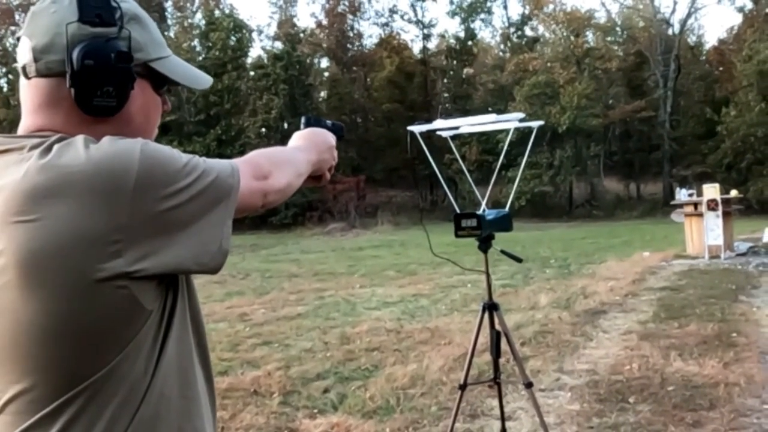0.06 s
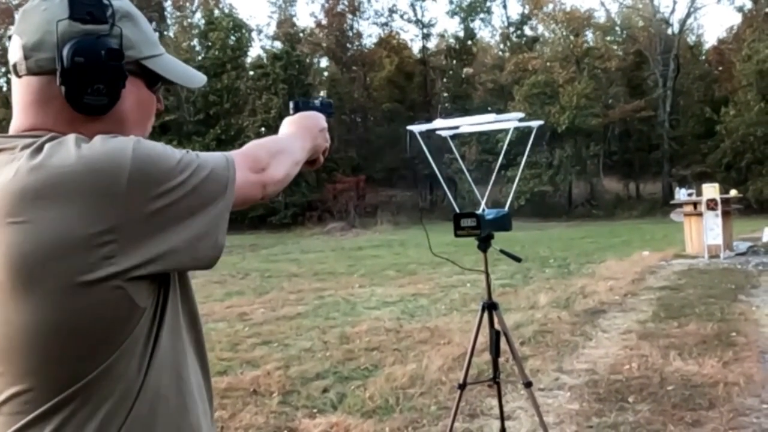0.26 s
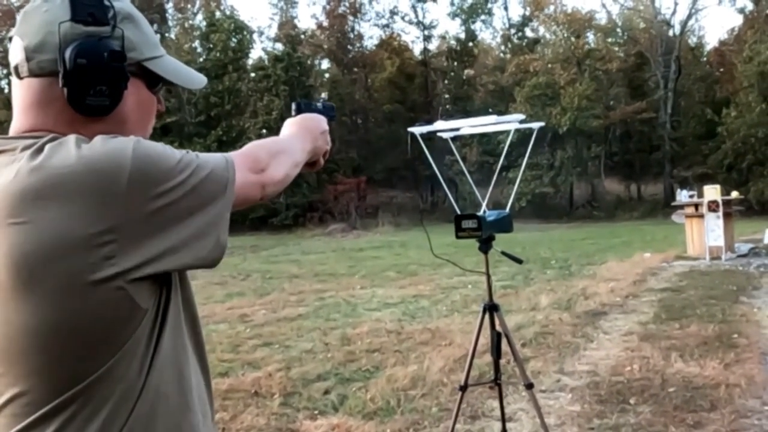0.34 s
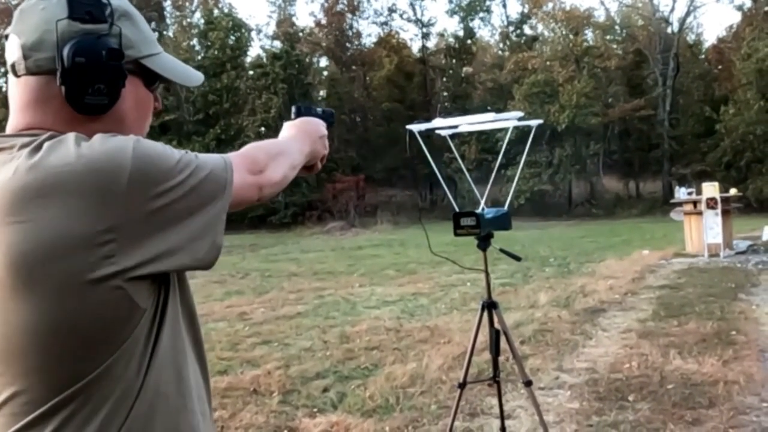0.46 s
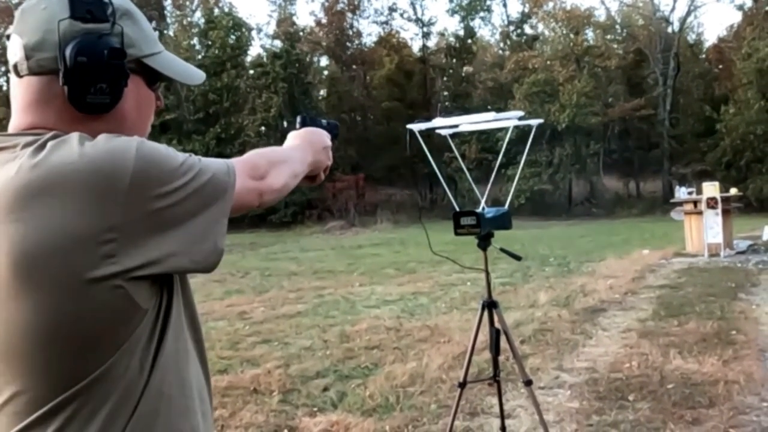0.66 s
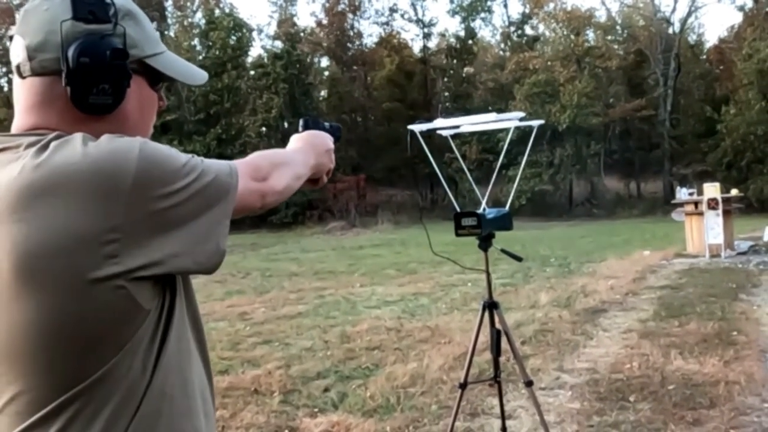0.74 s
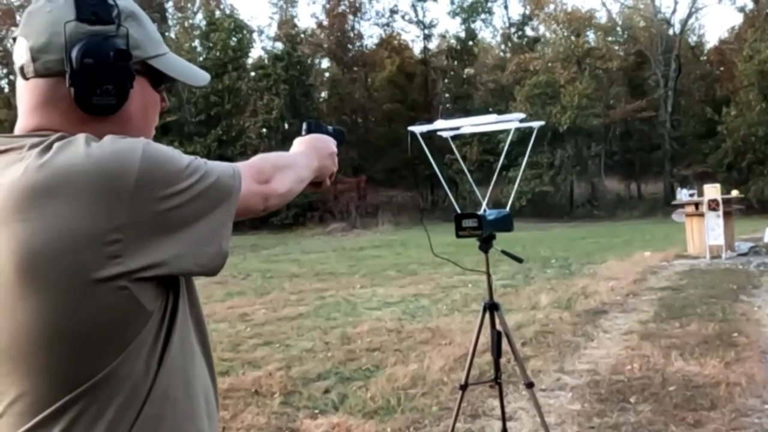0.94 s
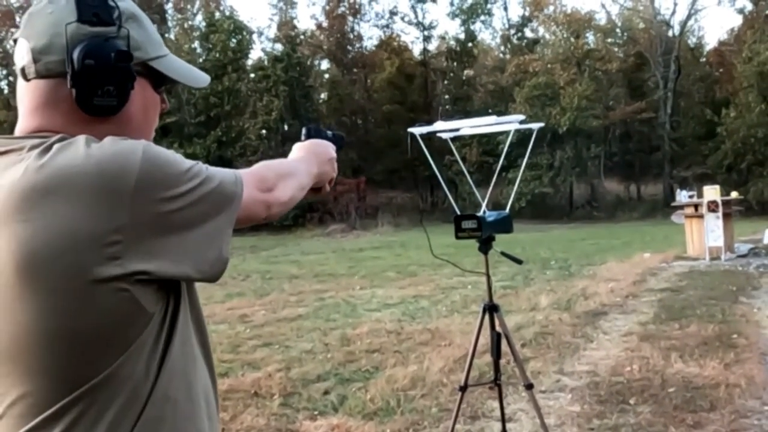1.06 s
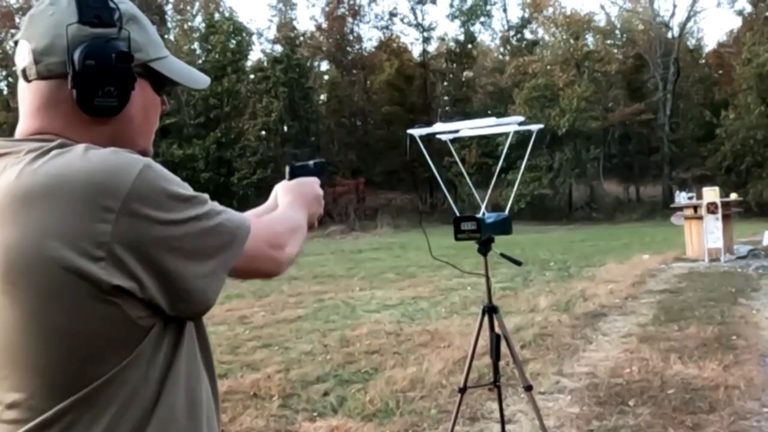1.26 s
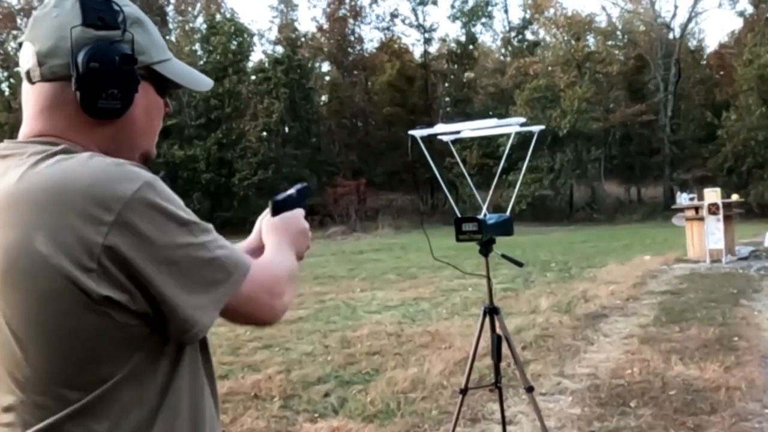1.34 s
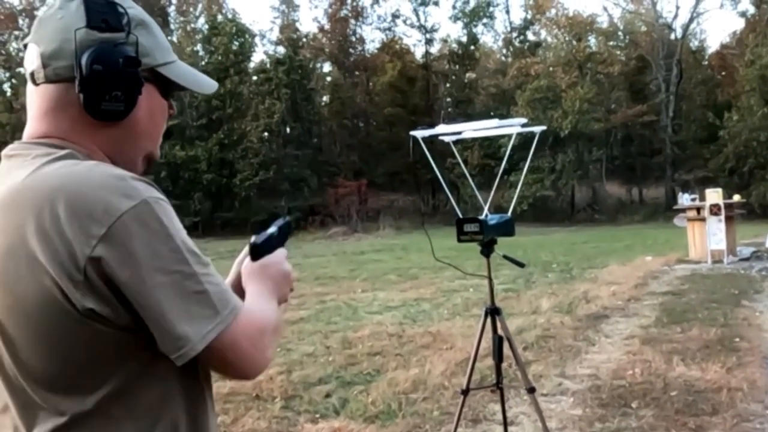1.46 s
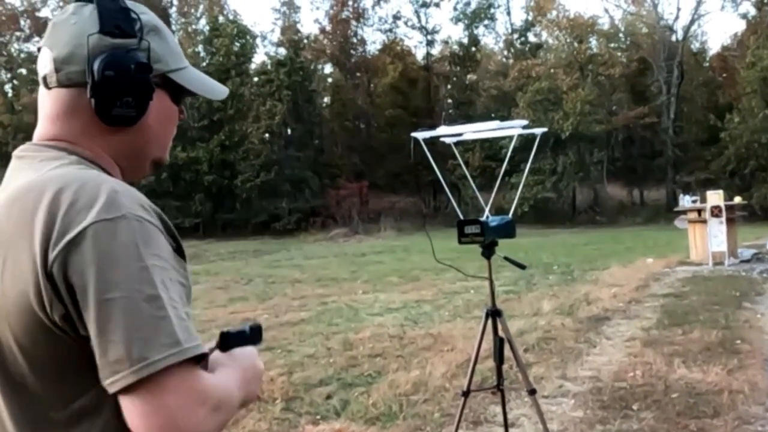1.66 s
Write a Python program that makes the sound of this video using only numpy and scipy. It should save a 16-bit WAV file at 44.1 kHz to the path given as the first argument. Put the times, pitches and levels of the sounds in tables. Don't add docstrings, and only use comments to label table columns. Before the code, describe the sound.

A single close pistol shot bursts out of a light breeze and faint insects, hard and overloaded on a small camera microphone; slap echoes and a dull woodland roll follow, with an empty casing ticking down.

```python
import sys
import numpy as np
from scipy import signal
from scipy.io import wavfile
from scipy.ndimage import uniform_filter1d

SR = 44100
rng = np.random.default_rng(int(sys.argv[2]) if len(sys.argv) > 2 else 0)


def log_audio(samples):
    frames = np.atleast_2d(samples).T
    limited = np.clip(frames, -1, 1)
    pcm = np.round(limited * 32767).astype(np.int16)
    wavfile.write(sys.argv[1], SR, pcm)


def attenuation_scalar(level_db):
    decades = np.asarray(level_db, float) / 20
    return 10 ** decades


N = 74970
T = np.arange(N) / SR
SHOT_S = .2218


def colour(points, hz):
    p = np.array(points)
    return np.interp(np.log(hz), np.log(p[:, 0]), p[:, 1])


def low_pass(x, hz, order):
    return signal.sosfilt(signal.butter(order, hz, fs=SR, output="sos"), x)


def band(x, hz, width=np.sqrt(2), order=2):
    edges = [hz / np.sqrt(width), min(hz * np.sqrt(width), .45 * SR)]
    return signal.sosfilt(signal.butter(order, edges, "band", fs=SR, output="sos"), x)


def fade(t60, start=0.):
    return (T >= start) * attenuation_scalar(-60 * np.clip(T - start, 0, None) / t60)


def delay(x, s):
    return np.roll(x, int(round(s * SR)), axis=-1)


def peak(x, db):
    return x * attenuation_scalar(db) / np.abs(x).max()


def stereo(mid, side):
    return mid + side * np.array([[1], [-1]])


def noise_pair(hz, width, order=2):
    return [b / b.std() for b in band(rng.standard_normal((2, N)), hz, width, order)]


def field():
    # frequency in Hz, level in dB per Hz.
    breeze_colour = [(25, -4), (92, -5), (205, -19.5), (330, -38), (720, -44.5), (1260, -36), (2900, -48.5),
                     (12800, -57.5)]
    breeze_db, duck_db, duck_treble_db = -49, -14, -18.5
    insect_hz, insect_db, throbs_per_s = 9750, -67.5, 54
    after_shot = T > SHOT_S

    breeze = 0
    for hz in 25 * 2 ** np.arange(0, 9.2, .5):
        mid, side = noise_pair(hz, np.sqrt(2), order=4)
        duck = np.where(after_shot, attenuation_scalar(duck_db if hz < 2000 else duck_treble_db), 1)
        wide = np.where(after_shot, .05, min(0.11 * (hz / 33.0) ** .5, .65))
        level_db = colour(breeze_colour, hz) + 10 * np.log10(hz)
        breeze = breeze + duck * attenuation_scalar(level_db) * stereo(mid, wide * side)
    before_shot = breeze[:, :int(.15 * SR)]
    breeze = breeze * attenuation_scalar(breeze_db) / before_shot.std()

    throb = .5 - .5 * np.cos(2 * np.pi * throbs_per_s * T + 1.7) + 0.53
    throb = throb * np.where(after_shot, attenuation_scalar(duck_treble_db), 1)
    insects = throb * band(rng.standard_normal((2, N)), insect_hz, 2.6) * 2
    return breeze + attenuation_scalar(insect_db) * insects


def casing():
    tick_s = [.156, 1.0322, 1.0375, 1.046, 1.127, 1.246, 1.298]
    # level in dB, pitch in Hz, length in seconds.
    ticks = [
        (-52, 2800, .003),
        (-35, 4300, .004),
        (-37, 4500, .006),
        (-48, 5200, .006),
        (-38, 2100, .014),
        (-63, 5000, .015),
        (-56, 4600, .045),
    ]
    ring_s, ring_hz, ring_db, ring_t60_s = 1.025, 10100, -73, .4

    ring = band(rng.standard_normal(N), ring_hz, 1.02) * 10
    out = attenuation_scalar(ring_db) * ring * fade(ring_t60_s, ring_s)
    for s, (db, hz, length) in zip(tick_s, ticks):
        noise = rng.standard_normal((2, N))
        shared_noise = noise[0] + 0.62 * noise
        attack = np.minimum(8 * T / length, 1)
        tick = band(shared_noise * fade(length) * attack, hz, 3.5, order=3)
        out = out + delay(peak(tick, db), s)
    return out


def lumps(per_s):
    step = int(SR / per_s)
    steps = np.repeat(rng.standard_normal(4000), step)[:N]
    return uniform_filter1d(steps, step)


def roll():
    # time in seconds, level in dB.
    swell = [(.225, -33.5), (.275, -42.5), (.31, -25), (.355, -40.5), (.375, -38.5), (.425, -26),
             (.47, -29), (.54, -22), (.75, -28), (1.0, -35), (1.3, -39.5), (1.7, -43.5)]
    # frequency in Hz, level in dB per Hz.
    roll_colour = [(60, -27), (150, -2), (300, -10), (700, 2), (1050, 0), (1700, -12), (5000, -18),
                   (13000, -47)]
    trunks_per_s, trunk_spread_db = 150, 1.5
    air_db_s, low_db_s = 7.5, 9.5
    notch_hz, notch_db_s = 277.8, 30.5
    wide_db, wide_tilt_db, narrow_db_s = -9.5, 5, 35
    early_low_db, early_hollow_db = 4.5, -9

    shared_lumps = lumps(trunks_per_s)
    late = np.clip(T - .5, 0, None)
    out = 0
    for hz in 50 * 2 ** np.arange(0, 8.3, 1 / 3):
        mid, side = noise_pair(hz, 2 ** (1 / 3))
        air_loss = air_db_s * max(hz / 1000. - 1, 0)
        ground_loss = notch_db_s * np.exp(-np.log(hz / notch_hz) ** 2 / 0.11)
        loss = air_loss + low_db_s * (hz < 250) + ground_loss
        side_db = min(wide_db + wide_tilt_db * np.log2(hz / 1000.), -2) - narrow_db_s * late
        grain_db = trunk_spread_db * min(3600.0 / hz, 1) ** .4 * shared_lumps + lumps(trunks_per_s)
        early_db = early_low_db * (170 < hz < 420) * (T < .48)
        early_db = early_db + early_hollow_db * (450 < hz < 1100) * (T < .36)
        level_db = colour(roll_colour, hz) + 10 * np.log10(hz / 1000.) - 9.5
        gain = attenuation_scalar(level_db + early_db - loss * late ** 0.52 + grain_db)
        out = out + gain * stereo(mid, attenuation_scalar(side_db) * side)
    return out * attenuation_scalar(np.interp(T, *np.array(swell).T)) * (T > SHOT_S)


def slaps():
    slap_s = [.294, .3032, .3056, .3096, .367, .4046, .4975, .515, .5212, 1.066, 1.627]
    # knock level in dB, thump level in dB, crack level in dB.
    slap_levels = [(-49.5, -27.5, -45.5), (-21.5, -35, -34), (-31, -29.5, -34), (-27, -26, -17.5),
                   (-22.5, -29.5, -46), (-39, -21, -52), (-12.5, -30.5, -50), (-12.5, -25.5, -48),
                   (-12.5, -20, -52), (-25.5, -47, -80), (-33.5, -60, -77.5)]
    knock_hz, knock_t60_s = 961, 0.056
    thump_hz, thump_t60_s = 137, 0.014
    crack_hz, crack_t60_s = 4200, .006
    push_s, push_length_s, push_db = .3130, .00135, -12.5

    push = -np.exp(-((T - push_s) / push_length_s) ** 2)
    out = push * attenuation_scalar(push_db) * np.array([[.7], [1.3]])
    thump = band(-np.sin(2 * np.pi * thump_hz * T) * fade(thump_t60_s), thump_hz, 3.6)
    knock_width = 1 + 20 / (knock_hz * knock_t60_s)
    for s, (knock_db, thump_db, crack_db) in zip(slap_s, slap_levels):
        noise = rng.standard_normal((3, N))
        strike = noise[0] * fade(0.0072) * np.minimum(T / 0.0014, 1)
        knock = band(strike, knock_hz, knock_width)
        crack_noise = noise[1] + .5 * noise[1:]
        crack = band(crack_noise * fade(crack_t60_s), crack_hz, 4, order=3)
        slap = peak(knock, knock_db) + peak(thump, thump_db) + peak(crack, crack_db)
        out = out + delay(slap, s)
    return out


def gas_burst():
    # frequency in Hz, width as a ratio, level in dB, decay t60 in seconds, side level in dB.
    blast_bands = [
        (143.6, 1.14, -10, 0.0086, -3),
        (209, 1.145, -11, .009, -5),
        (425.6, 1.562, -12.5, 0.0089, -10),
        (690, 1.89, -4.5, 0.027, -10),
        (1257, 1.35, -2.5, 0.0064, -7),
        (2780, 1.5, -6.5, .011, -3),
        (5470, 1.37, -3.5, .012, -18.5),
        (10800, 1.1, -14, .01, 2),
        (14800, 3.1, -23.5, 0.00838, -1.5),
    ]
    burst = 0
    for hz, width, db, t60, side_db in blast_bands:
        noise = rng.standard_normal((2, N)) * fade(t60)
        mid, side = (peak(b, db) for b in band(noise, hz, width))
        burst = burst + stereo(mid, attenuation_scalar(side_db) * side)
    return burst


def stutter(shot):
    # steps ahead of the blast, level in dB.
    copies = [
        (1, -4),
        (2, -7),
        (3, -17),
        (4, -26),
    ]
    step_s, dull_hz, top_db, smear_db = .01068, 3900, -26, -9.5

    soft = low_pass(shot, dull_hz, 4) + attenuation_scalar(top_db) * shot
    envelope = uniform_filter1d(np.abs(soft), size=64)
    ahead = 0
    for k, db in copies:
        smear = envelope * band(rng.standard_normal((2, N)), 2500, 4)
        copy = soft + attenuation_scalar(smear_db) * smear
        ahead = ahead + (-1) ** k * attenuation_scalar(db) * delay(copy, -k * step_s)
    return ahead


def blast():
    bounce_s, bounce_db, blast_db = .0049, -2, 3
    dive_s, dive_t60_s = .0112, 0.01
    after_db, after_t60_s = -28.5, 0.089
    whine_hz, whine_db = 7900, -46

    direct = gas_burst()
    bounce = band(direct, 1400, 6, order=1)
    dive = np.where(T < dive_s, 1, fade(dive_t60_s, dive_s))
    shot = peak(direct + attenuation_scalar(bounce_db) * delay(bounce, bounce_s), blast_db) * dive
    hiss = attenuation_scalar(after_db) * fade(after_t60_s) * band(rng.standard_normal((2, N)), 4700, 9.4)
    just_before = np.abs(T - SHOT_S + .017) < .017
    whine = attenuation_scalar(whine_db) * just_before * band(rng.standard_normal(N), whine_hz, 1.04) * 8
    return delay(shot + stutter(shot) + hiss, SHOT_S) + whine


def scene():
    quiet = slaps() + roll() + casing() + field()
    mic_top_hz = 13200
    return blast() + low_pass(quiet, mic_top_hz, 8)


def roll_off(x):
    return signal.sosfilt(signal.butter(12, 15700, fs=SR, output="sos"), x)


def record(dry):
    clipped = np.tanh(1.15 * dry) / 1.037
    return roll_off(clipped)


dry = scene()
out = record(dry)
log_audio(out)
```